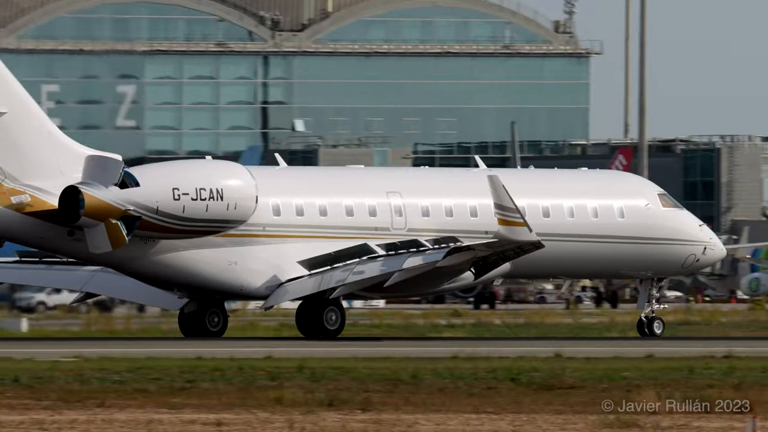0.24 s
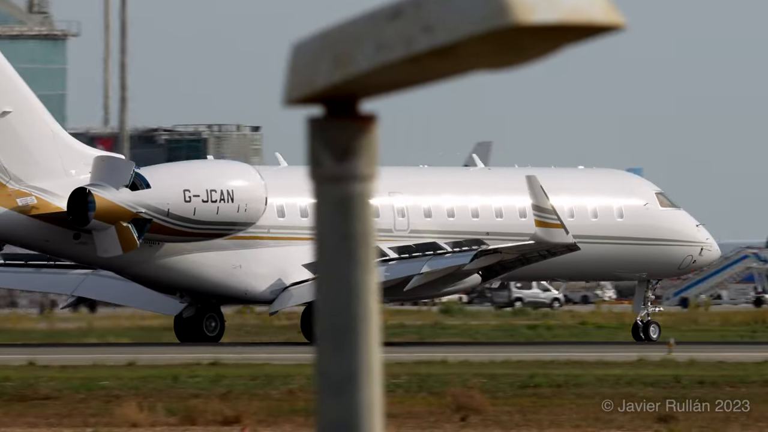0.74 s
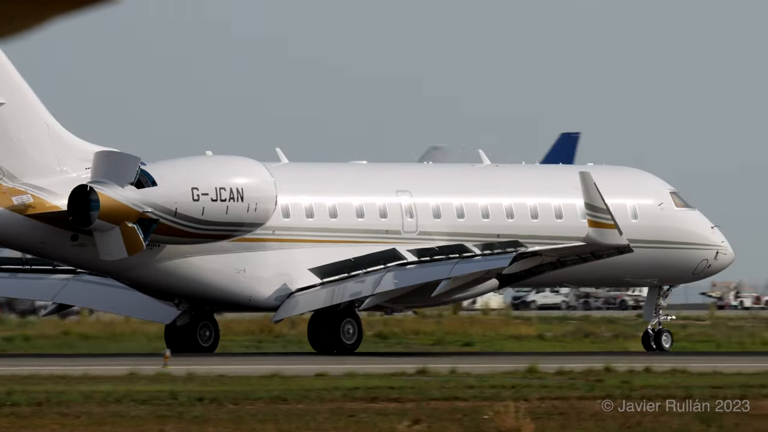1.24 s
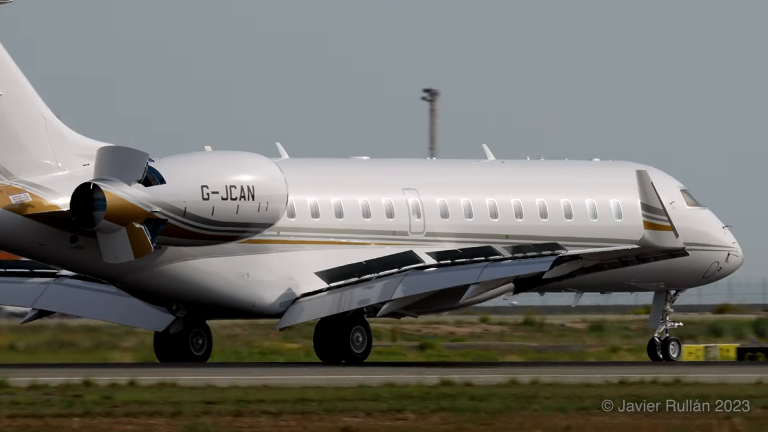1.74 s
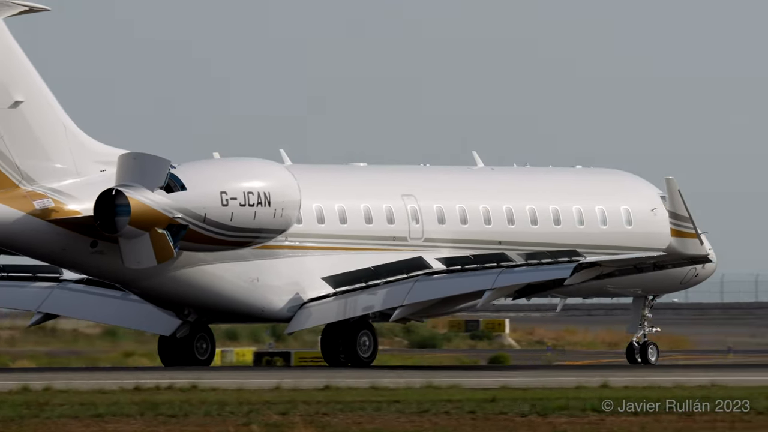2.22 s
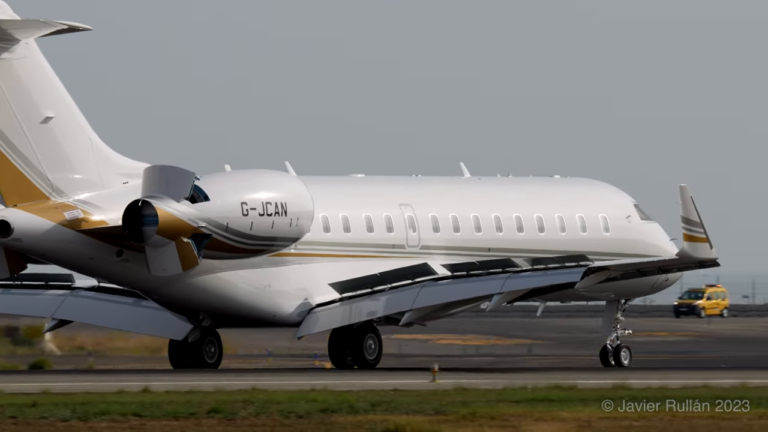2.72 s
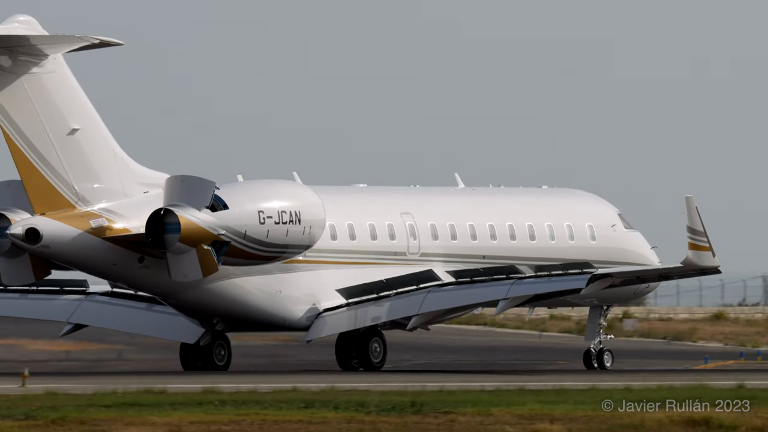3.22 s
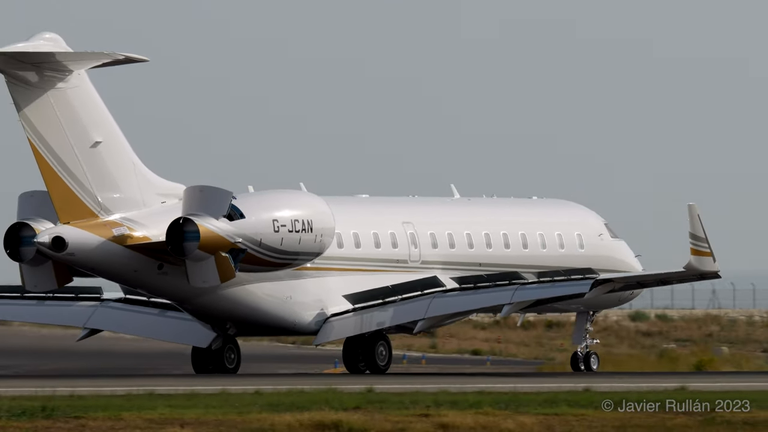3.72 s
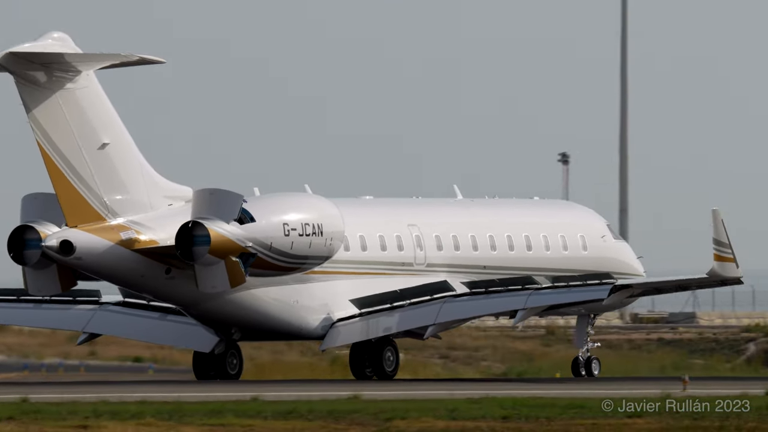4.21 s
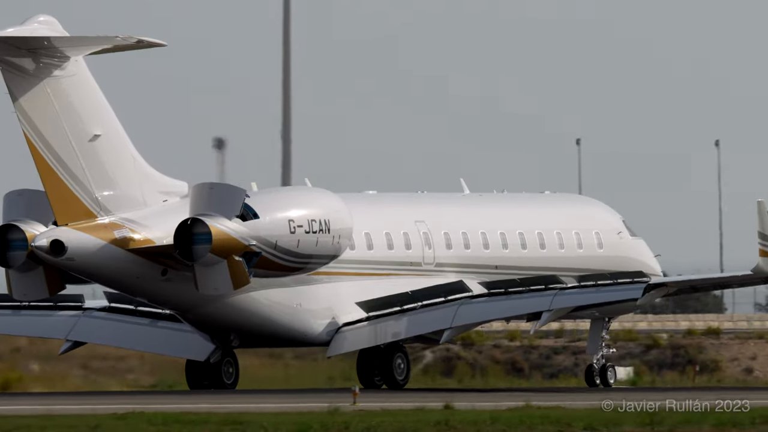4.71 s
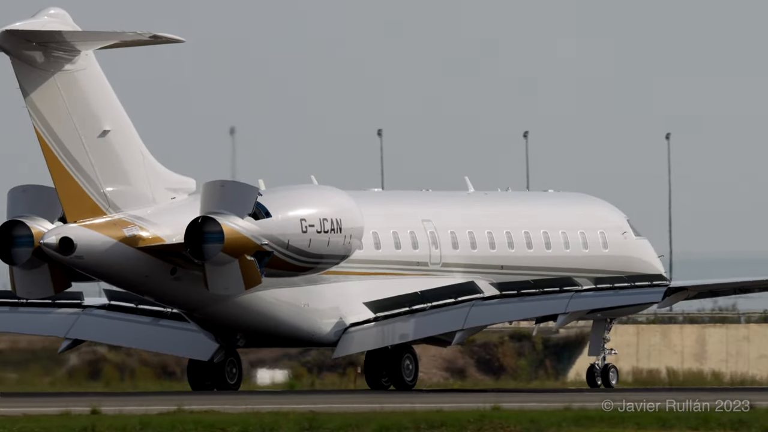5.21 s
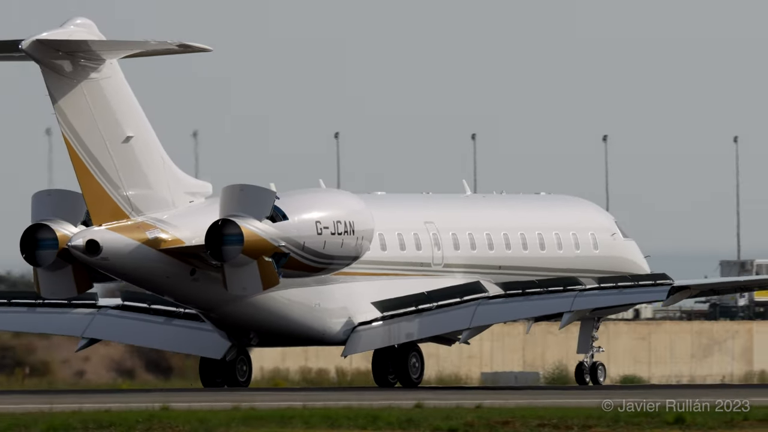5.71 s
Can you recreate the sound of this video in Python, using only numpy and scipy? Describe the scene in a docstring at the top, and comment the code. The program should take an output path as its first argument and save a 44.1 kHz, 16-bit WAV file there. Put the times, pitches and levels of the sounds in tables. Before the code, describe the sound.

Continuous roaring jet exhaust across grass, bright at first, then duller and slightly softer as the aircraft draws away down the runway.

```python
"""Across the grass from a runway, a business jet rolls past with its thrust reversers open, heard at one point.
The deflected jets make a broad rush of shaped noise over a low rumble; moving air makes it flutter.
A faint whine of two wavering tones and a thin top hiss ride on it, and the grass returns a dull echo.
As the aircraft draws away the rush drops a little and the ground swallows more of its lower roar."""
import sys
import numpy as np
from scipy import signal
from scipy.fft import rfft, irfft
from scipy.io import wavfile
from scipy.ndimage import uniform_filter1d, minimum_filter1d

SR = 44100
rng = np.random.default_rng(int(sys.argv[2]) if len(sys.argv) > 2 else 0)


def waveform_to_disk(signal):
    """Save audio, clipped to [-1, 1], as 16-bit WAV at the path in sys.argv[1]."""
    frames = np.transpose(np.atleast_2d(signal))
    scaled = np.clip(frames, -1, 1) * 32767
    samples = np.round(scaled).astype(np.int16)
    wavfile.write(sys.argv[1], SR, samples)


N = 262395
TIME = np.arange(N) / SR
FREQ = np.maximum(np.arange(N // 2 + 1) * SR / N, 1)

# Jet noise after its way through the air: (frequency [Hz], level per Hz [dB])
JET_NOISE_SPECTRUM = [(25, -42.5), (85, -35), (145, -19), (260, -17.5), (370, -10), (700, -4.5),
                      (1400, -1.2), (2250, -0.63), (3000, -3), (4000, -7), (5500, -16.5), (7200, -25),
                      (8600, -35.5), (12500, -70)]
# Fixed humps and hollows in the colour: (centre [Hz], width [Hz], size [dB])
RIPPLE = [(120, 30, 1.5), (192, 35, 1.5), (245, 55, -4), (810, 200, .6), (4870, 240, -3),
          (5700, 240, -3), (6280, 240, 1.8), (6750, 300, -1.2), (7200, 240, 1.3)]
# Tilt of the rush, bright in the edge of the beam and dull just behind it: (time [s], slope [dB per octave])
RUSH_SLOPE = [(0, 0.8), (.42, 0.3), (.65, -1.3), (.95, -1), (1.25, 0.02), (5.95, -.5)]
# Roar of the big eddies, before gusts and overall jet level: (time [s], level [dB])
ROAR_LEVEL = [(0, -15.5), (1.3, -14.5), (2.0, -13), (3.1, -14.5), (4.2, -13.5), (5.95, -17.5)]
# Swells, fades and tilts from moving air: (time [s], half length [s], level [dB], brightening [dB per octave])
AIR_GUSTS = [(0.414, .03, 1.8, 1), (1.366, 0.024, -3, 1.5), (1.58, .12, 1, 0.2), (1.712, .025, -3, -1),
             (1.953, 0.014, 3, 1), (2.163, .04, -2, 0), (2.37, 0.034, -2, 1), (2.438, 0.044, 1.1, 1.5),
             (2.87, .03, -1.4, -2), (3.098, 0.035, 2.5, -0.5), (3.75, 0.11, 0.2, 1.7),
             (4.004, 0.11, -2, -.5), (4.54, .07, 1.5, 0), (4.747, 0.087, 0, 1.5), (5.33, .04, -2, -1),
             (5.61, .05, -1.2, 1), (5.728, .05, 0.8, 1.5)]

# All the jet noise sinks with distance, and by one more step as the beam of the jets turns away
JETS_DB, RECEDE_DB_PER_S = -12, -0.09
TURN_S, TURN_LENGTH_S, TURN_DB = 3.32, 0.15, -2.5
# The bright edge of the beam passes first, on top of a steady hiss (both before the overall jet level)
EDGE_S, EDGE_LENGTH_S, EDGE_HISS_DB = 0.61, .14, -15
HISS_DB, HISS_DB_PER_S = -14.5, -0.32
# The favoured band climbs, with one quicker rise, as the aircraft turns its tail
CREST_HZ, CREST_HZ_PER_S, CREST_DB = 1370, 73, 2
CREST_JUMP_HZ, CREST_JUMP_S, CREST_JUMP_LENGTH_S = 650, 1.85, .6
# Frequency at which the bounce off the grass is one cycle late, and its climb
BOUNCE_HZ, BOUNCE_HZ_PER_S = 750, 33
# The rumble and the top hiss each grow from an offset below their final level
RUMBLE_DB, RUMBLE_START_DB, RUMBLE_RISE_S = -45.5, -6, .5
TOP_DB, TOP_START_DB, TOP_RISE_S = -55, -27, 2.8
# Whine: the two pitches at first, the share by which they sink, and how soon
FAN_HZ, COMPRESSOR_HZ, DOPPLER_DROP, DOPPLER_S = 2033, 5470, .055, 1.3
# The fan is quietest midway and stronger to either side; the compressor starts loud and settles
FAN_DB, FAN_QUIETEST_S, FAN_DB_PER_S = -32.5, 2.6, 0.5
COMPRESSOR_DB, COMPRESSOR_START_DB, COMPRESSOR_FADE_S = -53, 13.5, .7
CUT_HZ = 15700  # top of the heard range


def undb(db):
    """Turn decibels into a gain."""
    return 10 ** (np.asarray(db) / 20)


def unit(x):
    """Scale to an average strength (rms) of 1."""
    return x / np.sqrt(np.mean(x ** 2))


def curves(table):
    """Draw each column after the time as a line with one value a sample."""
    times, *columns = np.transpose(table)
    return [np.interp(TIME, times, column) for column in columns]


def step(at_s, length_s):
    """A smooth change from 0 to 1."""
    return .5 + .5 * np.tanh(2 * (TIME - at_s) / length_s)


def settle(length_s):
    """An exponential fall from 1 towards 0."""
    return np.exp(-TIME / length_s)


def below(hz, order=8):
    """Gain that lets low frequencies through."""
    return 1 / np.sqrt(1 + (FREQ / hz) ** (2 * order))


def above(hz, order=8):
    """Gain that lets high frequencies through."""
    return 1 / np.sqrt(1 + (hz / FREQ) ** (2 * order))


def noise(gain):
    """Random noise of rms 1, coloured by a gain at each frequency."""
    spectrum = rfft(rng.standard_normal(N))
    return unit(irfft(spectrum * gain, N))


def walk(hz):
    """A slow random wander of rms 1, moving up to about hz times a second."""
    return noise(below(hz, order=2))


def jet_colour():
    """Gain of the jet noise at each frequency: a broad hump with small fixed humps and hollows on it."""
    hz, db = np.transpose(JET_NOISE_SPECTRUM)
    colour_db = np.interp(np.log(FREQ), np.log(hz), db)
    for centre, width, size in RIPPLE:
        colour_db = colour_db + size * np.exp(-2 * ((FREQ - centre) / width) ** 2)
    return undb(colour_db)


def gusts():
    """Moving air adds smooth bumps of level (dB) and slope (dB per octave)."""
    level_db, slope_db = 0, 0
    for at_s, half_s, db, lean_db in AIR_GUSTS:
        bump = np.exp(-((TIME - at_s) / half_s) ** 2)
        level_db = level_db + db * bump
        slope_db = slope_db + lean_db * bump
    return level_db, slope_db


def rush(colour, slope_db, low_hz=670, high_hz=4400, crest_octaves=0.14, patchy_db=.5, count=9):
    """Middle of the jet noise: bands lean and crest with the beam, and each wavers in the moving air."""
    crest_jump = CREST_JUMP_HZ * step(CREST_JUMP_S, CREST_JUMP_LENGTH_S)
    crest_hz = CREST_HZ + CREST_HZ_PER_S * TIME + crest_jump
    middle_hz = np.sqrt(low_hz * high_hz)
    edges = np.geomspace(low_hz, high_hz, count + 1)
    total = 0
    for low, high in zip(edges, edges[1:]):
        gain = colour * above(low) * below(high)
        band = np.linalg.norm(gain) * noise(gain)  # keeps the band's natural strength
        centre = np.sqrt(low * high)
        lean = slope_db * np.log2(centre / middle_hz)
        closeness = np.exp(-(np.log2(centre / crest_hz) / crest_octaves) ** 2)
        crest = CREST_DB * (closeness - .4)  # lifts the favoured band, lowers the others
        total = total + band * undb(lean + crest + patchy_db * walk(9.1))
    return unit(total)


def jets(colour, rush_db=-0.42, flutter_db=.5, hiss_flutter_db=.5,
         roar_flutter_db=0.83, roar_gust_share=0.81, edge_top_hz=6500):
    """Big eddies roar, fine ones hiss; rush and hiss flutter together, the roar more slowly by itself."""
    level_db = JETS_DB + RECEDE_DB_PER_S * TIME + TURN_DB * step(TURN_S, TURN_LENGTH_S)
    big_db, = curves(ROAR_LEVEL)
    slope_db, = curves(RUSH_SLOPE)
    gust_db, gust_slope_db = gusts()
    flutter = walk(24)

    roar_db = big_db + roar_gust_share * gust_db + roar_flutter_db * walk(9)
    roar = noise(colour * above(245) * below(653)) * undb(roar_db)

    middle_db = rush_db + gust_db + flutter_db * flutter
    middle = rush(colour, slope_db + gust_slope_db) * undb(middle_db)

    treble = colour * above(4424)
    fine = noise(treble * below(14000)) * undb(HISS_DB + HISS_DB_PER_S * TIME)
    edge_fade = 1 - step(EDGE_S, EDGE_LENGTH_S)
    edge = noise(treble * below(edge_top_hz)) * undb(EDGE_HISS_DB) * edge_fade
    hiss = (fine + edge) * undb(gust_db + hiss_flutter_db * flutter)
    return (roar + middle + hiss) * undb(level_db)


def ground(direct, bounce_db=-14, absorb_hz=1300):
    """Grass returns low notes late; the lag shrinks with distance, so a hollow colour slides upward."""
    cycle_hz = BOUNCE_HZ + BOUNCE_HZ_PER_S * TIME
    dull = irfft(rfft(direct) * below(absorb_hz, order=3), N)
    bounce = np.interp(TIME - 1 / cycle_hz, TIME, dull, left=0)
    return direct + undb(bounce_db) * bounce


def rumble(colour):
    """Long waves hug the ground: the low noise builds up, then holds as the aircraft moves on."""
    level_db = RUMBLE_DB + RUMBLE_START_DB * settle(RUMBLE_RISE_S)
    return noise(colour * below(240)) * undb(level_db)


def blade_tone(hz, db, wander=.004, fade_db=3):
    """A blade-passing tone, its pitch smeared by uneven inflow, that fades in and out."""
    wandering_hz = hz * (1 + wander * walk(40))
    phase = 2 * np.pi * np.cumsum(wandering_hz) / SR
    tone = np.sin(phase) * undb(fade_db * walk(10))
    return unit(tone) * undb(db)


def whine():
    """Fan and compressor sing faintly and sink in pitch as the aircraft recedes (Doppler effect)."""
    doppler = 1 - DOPPLER_DROP * (1 - settle(DOPPLER_S))
    fan_db = FAN_DB + FAN_DB_PER_S * np.abs(TIME - FAN_QUIETEST_S)
    fan = blade_tone(FAN_HZ * doppler, fan_db, wander=.014)
    compressor_db = COMPRESSOR_DB + COMPRESSOR_START_DB * settle(COMPRESSOR_FADE_S)
    compressor = blade_tone(COMPRESSOR_HZ * doppler, compressor_db, wander=.006)
    return fan + compressor


def top_hiss():
    """A thin, high noise that slowly grows, ever more gently."""
    level_db = TOP_DB + TOP_START_DB * settle(TOP_RISE_S)
    return noise(above(10000) * below(8500, order=2)) * undb(level_db)


def scene():
    """All sources add up at one point, alike in both channels."""
    colour = jet_colour()
    mono = ground(jets(colour)) + rumble(colour) + whine() + top_hiss()
    return np.array([mono, mono])


def limiter(x, size=160):
    """Ease the gain down round each peak that would pass the ceiling (size in samples)."""
    ceiling = .87
    loudest = np.abs(x).max(axis=0)
    room = ceiling / np.maximum(loudest, ceiling)
    held = minimum_filter1d(room, 2 * size + 1)
    smooth = uniform_filter1d(uniform_filter1d(held, size), size)
    return x * smooth


def record(dry):
    """Hold down the highest peaks, then cut the very top steeply."""
    low_pass = signal.ellip(10, .1, 70, CUT_HZ, fs=SR, output="sos")
    return signal.sosfilt(low_pass, limiter(dry))


dry = scene()
out = record(dry)
waveform_to_disk(out)
```